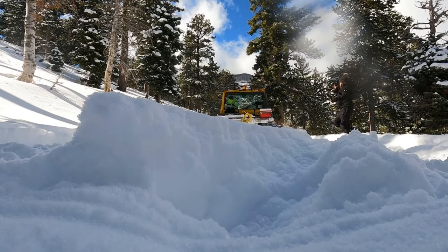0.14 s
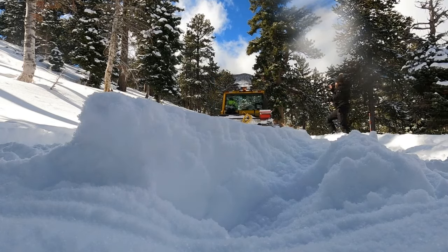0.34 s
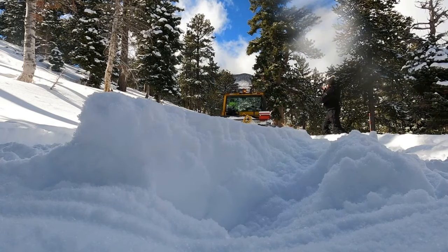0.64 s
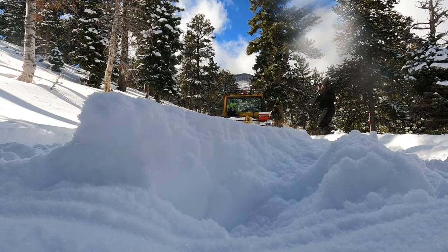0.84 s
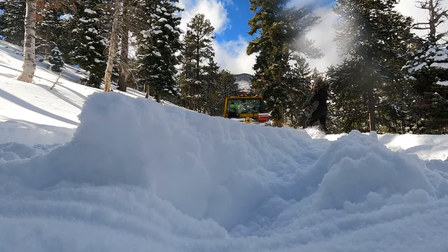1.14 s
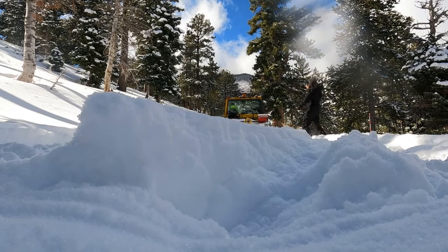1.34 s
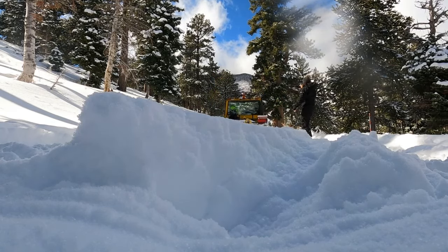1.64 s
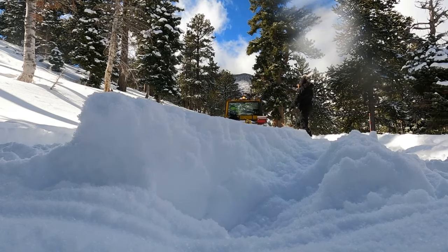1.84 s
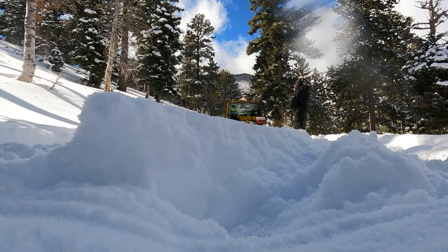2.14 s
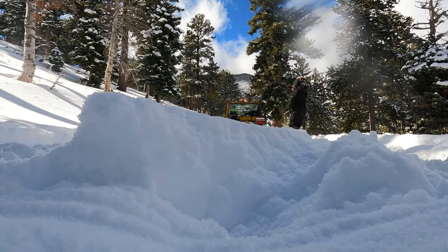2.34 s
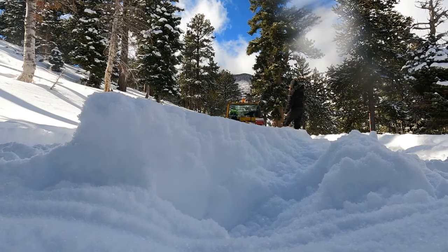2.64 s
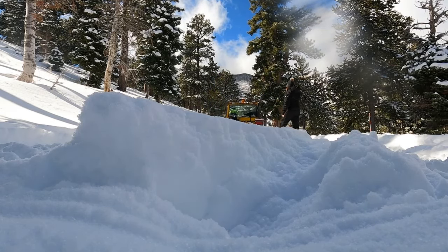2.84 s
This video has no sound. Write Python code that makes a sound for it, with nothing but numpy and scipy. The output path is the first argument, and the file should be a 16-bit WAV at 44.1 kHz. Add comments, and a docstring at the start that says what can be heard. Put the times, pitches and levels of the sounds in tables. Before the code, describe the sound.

A tracked snow vehicle's diesel engine holds a steady low drone some way off behind a snowbank, with dull knocking, clatter and faint hiss, after a brief low, hissy rush at the start; it slowly fades outdoors.

```python
"""Snow vehicle behind a bank

A tracked snow vehicle works at steady revs some way off, behind a snowbank in a forest, and slowly fades.
Its six-cylinder diesel drones in sine partials of the engine cycle, over a noise rumble of uneven firings.
Bursts of coloured noise make the dull knocking; throbbing, gritty noise makes the clatter and thin hiss.
At the start a rush of bright hiss with a low shudder dies away within a fifth of a second."""
import sys
import numpy as np
from scipy import signal
from scipy.fft import rfft, irfft
from scipy.io import wavfile

SR = 44100
rng = np.random.default_rng(int(sys.argv[2]) if len(sys.argv) > 2 else 0)


def to_wav(s):
    """Save 16-bit WAV."""
    ch = np.atleast_2d(s).T  # columns
    pcm = np.round(np.clip(ch, -1, 1) * 32767)  # PCM
    wavfile.write(sys.argv[1], SR, pcm.astype(np.int16))


N = 132300
CYLINDERS = 6


def from_db(db):
    """Decibels to gain."""
    return 10 ** (np.asarray(db) / 20)


def rms_one(x):
    """Scale to unit power."""
    return x / np.sqrt(np.mean(x ** 2) + 1e-20)


def seconds():
    """Time of every sample."""
    return np.arange(N) / SR


def from_middle():
    """Time of every sample, counted from the middle of the scene."""
    return seconds() - seconds().mean()


def in_time(rows):
    """Each column of a table as a curve in time."""
    time_s, *columns = np.transpose(rows)
    return [np.interp(seconds(), time_s, column) for column in columns]


def at_hz(points):
    """A table over frequency, read at every bin along a logarithmic axis."""
    hz, value = np.transpose(points)
    bin_hz = np.arange(N // 2 + 1) * SR / N
    return np.interp(np.log(bin_hz + 1e-9), np.log(hz), value)


def drift(rate_hz):
    """Slow chance with spread 1: noise through a two-pole low-pass, drawn at every 40th sample."""
    step = 40
    pole = np.exp(-2 * np.pi * rate_hz * step / SR)
    noise = rng.standard_normal(N // step + 2002)
    slow = signal.lfilter([1], [1, -2 * pole, pole * pole], noise)[2000:]  # past the filter's start
    return np.interp(np.arange(N) / step, np.arange(len(slow)), rms_one(slow))


def gritty(grit_db):
    """Noise whose strength jumps every few milliseconds."""
    return rms_one(rng.standard_normal(N) * from_db(grit_db * drift(85)))


def pan(db):
    """Left and right gains for a level difference, left minus right."""
    return from_db(np.array([[.5], [-.5]]) * db)


def coloured(source, spectrum, image=None):
    """Colour an excitation and spread it in stereo with scattered sound; the middle has unit power."""
    # scattered sound against direct sound at mid-scene: hz, side_db
    vehicle_scatter = [(50, -36), (110, -33), (170, -27.5), (260, -31), (400, -25.5), (620, -19),
                       (1000, -20), (1600, -17), (1980, -18), (2250, 0), (2550, 2), (2780, -9.5),
                       (3300, -14), (4200, -19), (5500, -17), (7000, -29.5), (8300, -21.5), (9300, -3),
                       (11500, -10.5), (13000, -8)]
    # lean of the vehicle's noise across the stereo pair: hz, left_minus_right_db
    vehicle_balance = [(100, 0.7), (380, 4), (700, 0.3), (1200, 2.5), (1700, 3), (2150, -2), (2450, 3.5),
                       (2720, 8.5), (3100, 6), (3900, 3.5), (4600, 0.5), (5350, -4), (5900, -0.5),
                       (8300, 0.5), (10000, 3)]
    if image is None:
        image = vehicle_scatter, vehicle_balance, 3  # less direct sound as the vehicle sinks behind the bank
    scatter, balance, grows_db_per_s = image
    mid = rfft(rms_one(source))
    scattered = rng.standard_normal(N) * from_db(grows_db_per_s * from_middle())
    side = from_db(at_hz(scatter)) * rfft(scattered)
    left_right = np.array([mid + side, mid - side])
    out = irfft(from_db(at_hz(spectrum)) * pan(at_hz(balance)) * left_right, N)
    return out / out.mean(axis=0).std()


def exhaust(cycle):
    """A clean firing note among wavering partials of unequal cylinders; upper ones fade, lower ones grow."""
    # loudness of the exhaust drone: time_s, level_db
    drone = [(0.12, -22.5), (0.47, -21.5), (0.55, -25), (0.72, -22), (1.05, -23), (1.3, -23.5),
             (1.76, -24.5), (1.93, -23), (1.99, -26.5), (2.04, -25), (2.69, -24), (2.92, -25.5)]
    # lean of the drone across the stereo pair: time_s, left_minus_right_db
    drone_pan = [(.8, -.15), (1.4, -.4), (2.4, -.6)]
    # exhaust partials: multiple_of_cycle_rate, level_db (within the drone)
    partials = [(2, -24), (3, -18), (4, -20), (6, 0.48), (7, -29.5), (8, -33), (9, -31.5), (10, -29.5),
                (11, -34), (12, -26.5), (14, -36), (16, -31), (18, -27.5), (20, -43), (22, -39.5),
                (24, -37.5), (26, -41.5)]
    note_waver_db, partial_waver_db, partial_wander_turns = .5, 2.5, .05
    fade_db_per_s_per_octave = 1

    level_db, = in_time(drone)
    side_db, = in_time(drone_pan)
    out = 0
    for order, db in partials:
        if order == CYLINDERS:
            waver_db, wander = note_waver_db * drift(10.0), 0
        else:
            octaves = np.log2(order / CYLINDERS)  # above the firing note
            fade_db = -fade_db_per_s_per_octave * octaves * from_middle()
            waver_db = partial_waver_db * drift(3.0) + fade_db
            wander = partial_wander_turns * drift(4.2)
        turns = order * cycle + wander + rng.random()
        out = out + from_db(db + waver_db) * np.sin(2 * np.pi * turns)
    return np.sqrt(2) * out * from_db(level_db) * pan(side_db)


def rumble():
    """No two firings are equal, which spreads a rumble around the note; its deepest part ebbs and returns."""
    # level of the deepest rumble, below the firing note: time_s, level_db
    deep_level = [(.3, -34.5), (.8, -40.5), (1.2, -46.5), (1.6, -40), (2.05, -35.5), (2.35, -40.5),
                  (2.9, -37.5)]
    # colour of the deepest rumble: hz, relative_db_per_hz
    deep_colour = [(14, -30), (22, -15), (31, -3), (45, -1), (60, 0), (75, -7), (110, -29.5), (400, -80)]
    # colour of the rumble around the note: hz, relative_db_per_hz
    rumble_colour = [(20, -25), (45, -8), (80, 1.5), (110, -3), (160, -13.5), (210, -15.5), (265, -21.5),
                     (310, -27), (380, -29.5), (450, -33), (700, -44.5), (3000, -100)]
    start_db, fade_db_per_s = -38.5, 1.0

    deep_db, = in_time(deep_level)
    deep = from_db(deep_db) * coloured(rng.standard_normal(N), deep_colour)
    around_db = start_db - fade_db_per_s * seconds()
    around = from_db(around_db) * coloured(rng.standard_normal(N), rumble_colour)
    return deep + around


def knocking(cycle):
    """Every firing rattles the panels with a burst rounded by distance; cylinders differ, knocks surge."""
    # level of the knocking: time_s, level_db
    knock_level = [(0.2, -54), (0.55, -50.5), (1.15, -47.5), (1.55, -51), (2.0, -56), (2.9, -57)]
    # strength of each cylinder's knock, in firing order: relative_db
    cylinder_strength = [2, -4, -1.5, 0.5, -3.5, -0.5]
    # colour of the panels that the knocks ring: hz, relative_db_per_hz
    panels = [(400, -35), (650, -10), (820, -4.5), (940, 0), (1040, 0), (1130, -0.5), (1230, -6),
              (1350, -14.5), (1950, -18), (2250, -33), (4000, -52)]
    spread_db, surge_db, roundness = 1.5, 1.3, .7

    level_db, = in_time(knock_level)
    firing, since = np.divmod(cycle * CYLINDERS, 1)  # count of firings, and fraction of the present one
    firing = firing.astype(int)
    chance_db = spread_db * rng.uniform(-1, 1, firing[-1] + 1)
    strength_db = np.array(cylinder_strength)[firing % CYLINDERS] + chance_db[firing]
    bursts = from_db(strength_db + surge_db * drift(24)) * np.sin(np.pi * since) ** roundness
    return from_db(level_db) * coloured(bursts * rng.standard_normal(N), panels)


def engine_noise(cycle, repeat, grit_db):
    """Noise that recurs in every engine cycle, mixed with fresh grit; both throb with crank and firings."""
    firing_throb, crank_throb = .06, .056  # depth of the pulsing
    size = int(N / cycle[-1])  # samples in one cycle
    recurring = rng.standard_normal(size)[(cycle % 1 * size).astype(int)]
    mixed = np.sqrt(repeat) * recurring + np.sqrt(1 - repeat) * gritty(grit_db)  # repeat: share of the power
    firings = firing_throb * np.sin(2 * np.pi * CYLINDERS * cycle)
    crank = crank_throb * np.cos(2 * np.pi * 2 * cycle)  # two crank turns to a four-stroke cycle
    return (1 + firings + crank) * mixed


def machinery(cycle):
    """Knock of the block, diesel clatter, and the hiss of the running machine."""
    # levels before each layer's trim: time_s, block_db, clatter_db, hiss_db, top_of_hiss_db
    levels = [(0.27, -47.5, -45, -53.5, -67), (0.31, -46, -46, -54.5, -68.5),
              (0.48, -47.5, -46.5, -56.5, -70), (0.51, -44, -46, -55, -70.5), (1.52, -51, -45.5, -58, -69),
              (1.8, -48.5, -46.5, -57.5, -66), (2.06, -50.5, -47, -59, -69.5), (2.65, -50, -48, -54, -65.5),
              (2.9, -51, -47.5, -56.5, -65.5), (2.92, -50.5, -49, -56, -65.5)]
    # colours of the four layers, each: hz, relative_db_per_hz
    block_colour = [(150, -28.5), (300, -8), (440, -8.5), (530, -1.5), (600, 0), (730, -1.5), (790, -1.5),
                    (900, -11), (1200, -60.5), (4000, -79)]
    clatter_colour = [(200, -63), (600, -27), (800, -9.5), (950, 0.5), (1080, -6), (1240, -5),
                      (1320, -11.5), (1520, -9.5), (1640, -12.5), (1960, -8.2), (2220, -25.5), (2700, -30),
                      (4000, -65.5), (8000, -83.5)]
    hiss_colour = [(1000, -44.5), (1800, -27), (2300, -11.5), (2550, -8), (2760, 2), (3150, -0.5),
                   (4100, -1), (4500, -4.5), (5100, -6), (5800, -16), (8000, -40.5), (12000, -72.5)]
    top_colour = [(2500, -47.5), (4500, -11.5), (5700, 0), (6400, 3.5), (6800, 2), (7300, 2.5), (7850, -3),
                  (8200, -8.5), (9200, -14.5), (10000, -13), (11800, -18.5), (12800, -38), (15000, -50)]
    block_trim_db, clatter_trim_db, hiss_trim_db, top_trim_db = -0.63, -0.7, -0.5, 0.5

    block_db, clatter_db, hiss_db, top_db = in_time(levels)
    block = coloured(engine_noise(cycle, repeat=0.28, grit_db=-0.4), block_colour)
    clatter = coloured(engine_noise(cycle, repeat=0.19, grit_db=1.0), clatter_colour)
    hiss = coloured(engine_noise(cycle, repeat=0.085, grit_db=1.1), hiss_colour)
    top = coloured(engine_noise(cycle, repeat=0.045, grit_db=1.0), top_colour)
    out = from_db(block_db + block_trim_db) * block
    out = out + from_db(clatter_db + clatter_trim_db) * clatter
    out = out + from_db(hiss_db + hiss_trim_db) * hiss
    return out + from_db(top_db + top_trim_db) * top


def dying(level_db, hold_s, fall_db_per_s):
    """An envelope that holds briefly, then falls."""
    return from_db(level_db - fall_db_per_s * np.maximum(seconds() - hold_s, 0))


def opening_rush():
    """A low shudder with a little buffeting, hiss and a gritty spray above it die away quickly."""
    # colours of the buffeting, hiss and spray, each: hz, relative_db_per_hz
    low_colour = [(15, -17.5), (30, -2), (65, -0.5), (120, -10.5), (250, -27.5), (500, -46), (1000, -57.5),
                  (4000, -100)]
    hiss_colour = [(150, -21), (400, 1), (800, 4.5), (2000, -1.5), (3500, -1.5), (6000, -9.5),
                   (9000, -22.5), (14000, -41.5)]
    spray_colour = [(1500, -31), (4000, -2), (7000, -0.5), (10000, -2), (14500, -11.5)]
    # scattered sound against direct sound: hz, side_db
    rush_scatter = [(60, -40), (120, -26.5), (190, -9), (380, -15), (650, -5.5), (1650, 2.5), (5000, 1.5),
                    (14000, 0)]
    # lean across the stereo pair: hz, left_minus_right_db
    rush_balance = [(400, 0.0039), (3000, 0.008)]
    image = rush_scatter, rush_balance, 0  # the scatter holds steady
    shudder_hz, wander_turns = 42.6, .06

    turns = shudder_hz * seconds() + wander_turns * drift(10) + rng.random()
    shudder = dying(level_db=-17, hold_s=0.011, fall_db_per_s=42) * np.sin(2 * np.pi * turns)
    shudder = shudder * dying(level_db=0, hold_s=0.135, fall_db_per_s=254)  # then a steeper fall
    low = coloured(rng.standard_normal(N), low_colour, image)
    low = low * dying(level_db=-27, hold_s=0.025, fall_db_per_s=71.5)
    hiss = coloured(gritty(grit_db=1.0), hiss_colour, image)
    hiss = hiss * dying(level_db=-40.0, hold_s=0.027, fall_db_per_s=72)
    hiss = hiss * dying(level_db=0, hold_s=0.13, fall_db_per_s=49)  # the fall steepens
    spray = coloured(gritty(grit_db=1.5), spray_colour, image)
    spray = spray * dying(level_db=-48, hold_s=0.015, fall_db_per_s=144.5)
    return shudder + low + hiss + spray


def scene():
    """One engine cycle drives the exhaust, knocking and machinery; the rumble and opening rush run free."""
    # governed engine speed: time_s, firing_rate_hz
    speed = [(0, 90.5), (.6, 90.6), (.85, 90.2), (1.5, 90.5), (2.1, 90.15), (2.6, 89.8), (3, 89.8)]
    firing_hz, = in_time(speed)
    cycle = np.cumsum(firing_hz) / SR / CYLINDERS  # four-stroke cycles since the start
    return exhaust(cycle) + rumble() + knocking(cycle) + machinery(cycle) + opening_rush()


def record(dry):
    """The top is cut steeply; the sound starts and stops without a click."""
    edge_s, cutoff_hz = .0015, 16400
    edges = np.clip(np.minimum(seconds(), seconds()[::-1]) / edge_s, 0, 1)
    steep_cut = signal.cheby2(14, 70, cutoff_hz, fs=SR, output="sos")  # 70 dB down from the cutoff up
    return signal.sosfilt(steep_cut, dry * edges)


dry = scene()
out = record(dry)
to_wav(out)
```